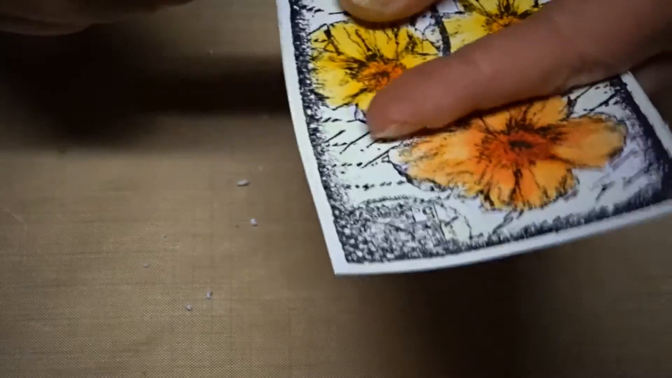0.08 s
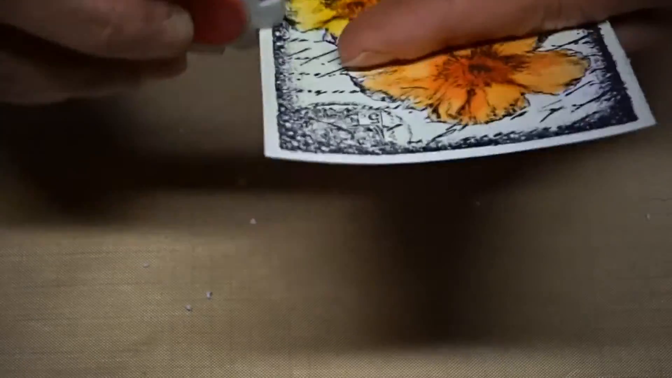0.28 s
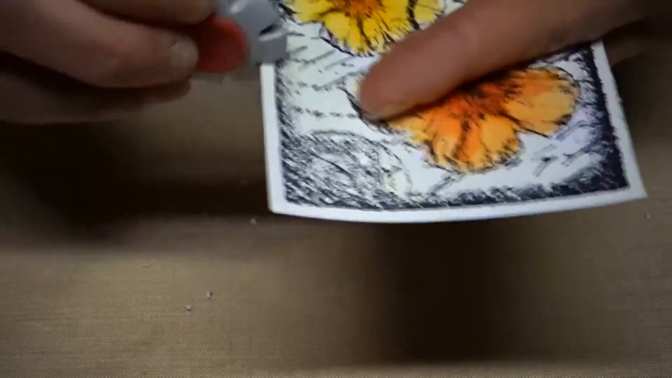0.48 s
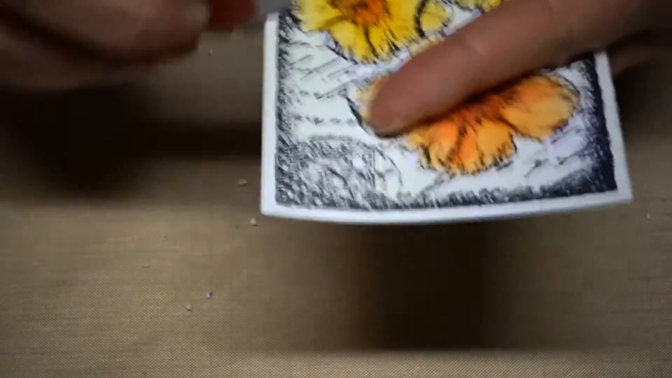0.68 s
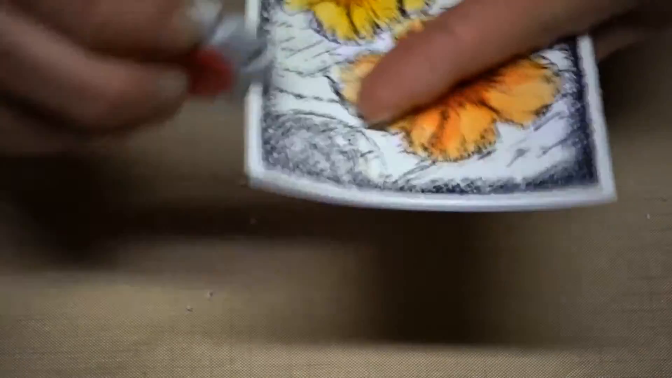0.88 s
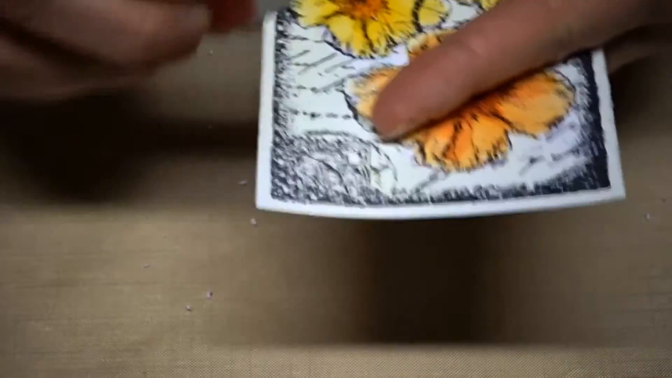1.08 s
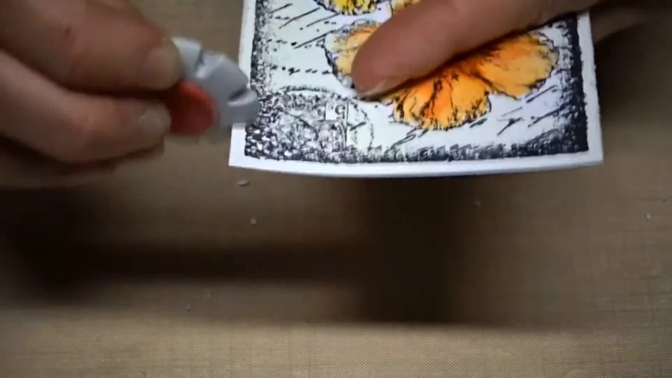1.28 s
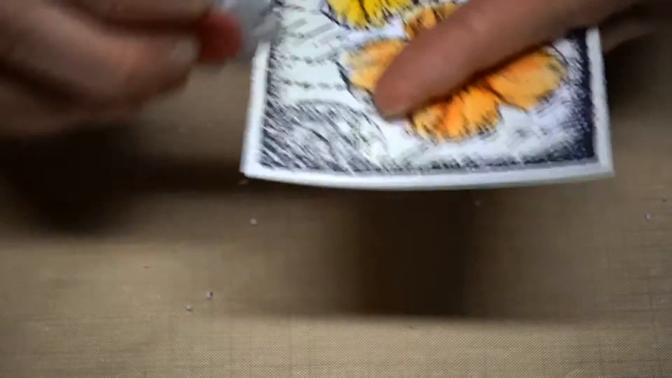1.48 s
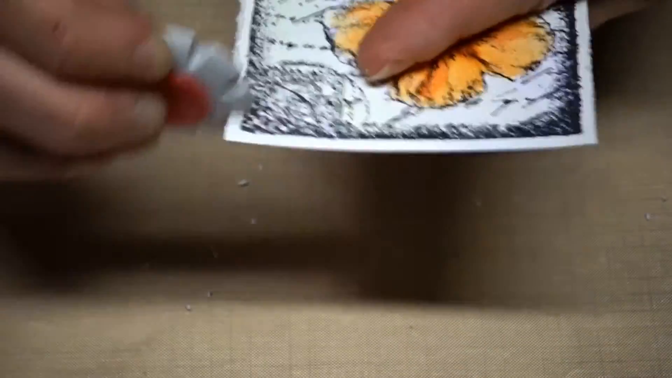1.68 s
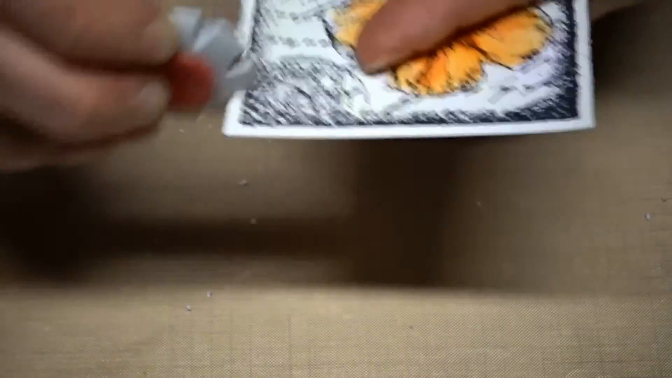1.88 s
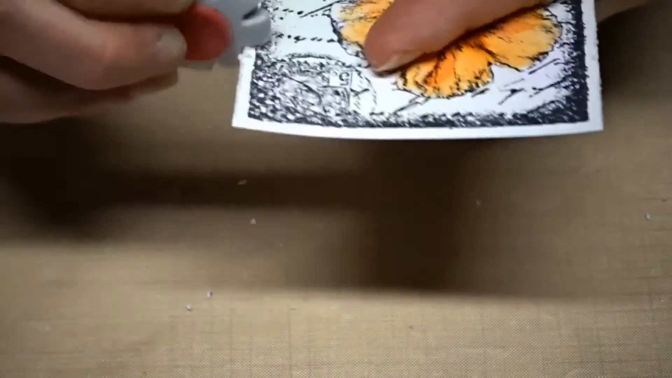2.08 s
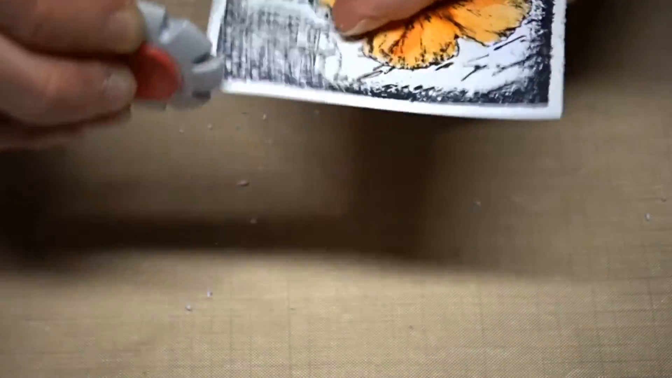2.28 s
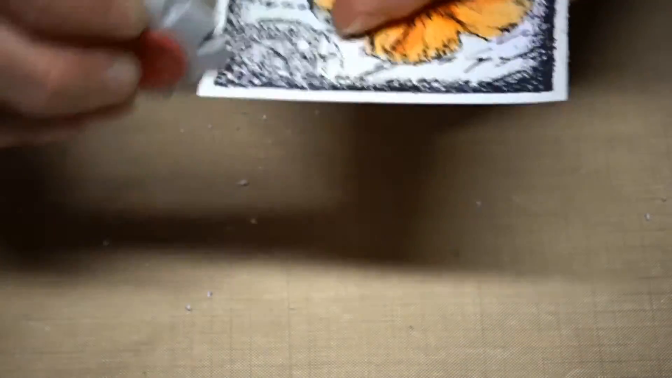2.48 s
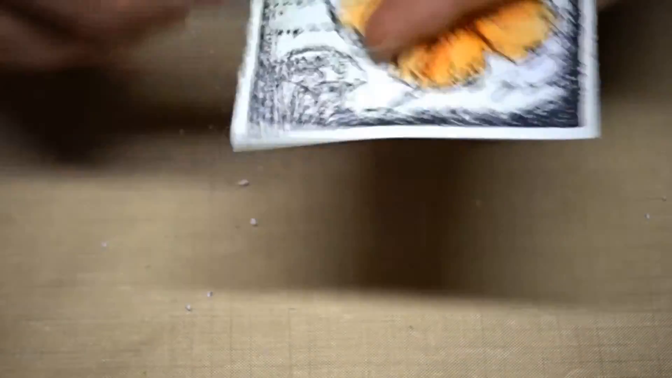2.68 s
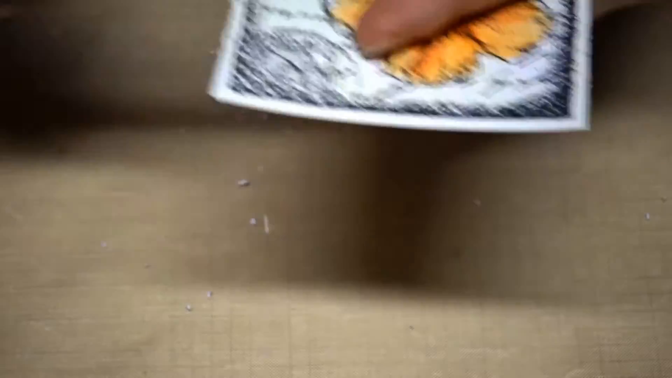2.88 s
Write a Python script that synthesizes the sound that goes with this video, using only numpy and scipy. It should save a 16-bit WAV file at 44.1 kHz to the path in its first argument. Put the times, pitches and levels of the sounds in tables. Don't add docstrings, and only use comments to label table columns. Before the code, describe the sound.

A small notched blade scrapes a paper card edge, close to a stereo microphone: faint touches, then quick firm raspy strokes with tiny gaps and occasional sharp snaps, in a quiet small room.

```python
import sys
import numpy as np
from scipy import signal
from scipy.fft import rfft, irfft, next_fast_len
from scipy.io import wavfile
from scipy.ndimage import uniform_filter1d, map_coordinates

SR = 44100
rng = np.random.default_rng(int(sys.argv[2]) if len(sys.argv) > 2 else 0)


def transcribe(u):
    v = np.clip(np.atleast_2d(u).T, -1, 1)
    q = np.round(v * 32767).astype(np.int16)
    wavfile.write(sys.argv[1], SR, q)


def volts(x):
    e = np.asarray(x, float) / 20
    return 10 ** e


N = 134505


def unit(x):
    return x / np.sqrt(np.mean(abs(x) ** 2) + 1e-20)


def along(points, hz):
    f, v = np.transpose(points)
    return np.interp(np.log(hz + 1), np.log(f + 1), v)


def filtered(x, response):
    m = next_fast_len(N + SR // 2)
    return irfft(rfft(x, m) * response(np.fft.rfftfreq(m, 1 / SR)), m)[..., :N]


def causal(points):
    def response(hz):
        c = irfft(np.log(volts(along(points, hz))))
        c[1:len(c) // 2] *= 2
        c[len(c) // 2 + 1:] = 0
        return np.exp(rfft(c))
    return response


def resonances(rows):
    def response(f):
        total = 0
        for k, (centre, width, db) in enumerate(rows):
            damping = 1j * f * width
            total = total + (-1) ** k * volts(db) * damping / (centre * centre - f * f + damping)
        return total
    return response


def wobble(rate_hz):
    return map_coordinates(rng.standard_normal(3000), [np.arange(N) * rate_hz / SR])


def lumps(rate_hz):
    ceiling = 1.96
    w = wobble(rate_hz)
    return np.where(w > 0, ceiling * np.tanh(w / ceiling), w)


# f/Hz, density/dB per Hz
TONE = [(100, -66), (170, -6.5), (190, -9), (1910, -19), (2140, -20.5), (8870, -30), (15000, -38)]
# f/Hz, level/dB
TONE_SIDE = [(200, -7), (1000, 1), (8000, -1.5)]
# f/Hz, width/Hz, level/dB
HUM_BANDS = [(50, 64, -77.5), (101, 16, -72), (141, 16, -76)]


def air():
    tone_db, hum_side_db = -67, -21

    def colour(hz):
        return volts(along(TONE, hz) + [0 * hz, along(TONE_SIDE, hz)])

    def bands(f):
        return sum(volts(db) * unit(1 / (1 + ((f - c) / w * 2) ** 2)) for c, w, db in HUM_BANDS)

    pair = filtered(rng.standard_normal((2, N)), colour)
    hum = filtered(rng.standard_normal((2, N)), bands) * volts([[0], [hum_side_db]])
    return volts(tone_db) * pair / pair[0].std() + hum


# t/s, length/s, start level/dB, end level/dB
STROKE_LIST = [(.045, 0.061, -72, -58.5), (.097, 0.081, -58.5, -57), (.177, 0.016, -56, -50),
               (.195, 0.02, -48.5, -45), (0.225, 0.12, -37.5, -44.5), (0.341, 0.13, -38, -36.5),
               (0.527, 0.14, -33, -41.5), (0.727, 0.15, -39.5, -33), (0.959, 0.11, -31, -39),
               (1.135, 0.15, -39.5, -29.5), (1.372, 0.0401, -39, -37), (1.432, 0.068, -28.5, -43.5),
               (1.538, 0.15, -40, -36.5), (1.745, 0.092, -36, -38.5), (1.91, 0.095, -41.5, -35),
               (2.068, 0.0803, -37, -43), (2.204, 0.077, -45, -37), (2.379, 0.088, -25.5, -41.5),
               (2.503, 0.088, -42.5, -39.5), (2.649, 0.035, -35.5, -38.5), (2.709, 0.042, -42.5, -47),
               (2.739, 0.045, -44, -33.5), (2.79, 0.029, -58, -51)]


def pressure(extra_db, attack_s=0.0024, late_db=0):
    release_s, arch_db = 0.017, 5
    out = np.zeros(N + SR)
    for (start_s, length_s, start_db, end_db), db in zip(STROKE_LIST, extra_db):
        t = np.arange(round((length_s + 5 * release_s) * SR)) / SR
        u = np.minimum(t / length_s, 1)
        release = np.exp(-np.maximum(t - length_s, 0) / release_s * 2)
        gate = np.minimum(t / attack_s, 1) * release
        slope_db = start_db + (end_db - start_db + late_db) * u
        arched_db = arch_db * (np.sin(np.pi * u) - .5)
        out[round(start_s * SR):][:len(t)] += gate * volts(db + slope_db + arched_db)
    return out[:N]


def tears():
    tears_per_s, spread_db, hiss_share, clump_db, clumps_per_s = 3500, 3.5, 0.4, 2.5, 280
    draw = rng.random((2, N))
    hits = draw[0] < tears_per_s / SR
    sizes = volts(-spread_db * np.log(abs(2 * draw[1] - 1) + 0.0078))
    pops = hits * np.sign(draw[1] - .5) * sizes
    grain = unit(pops) + hiss_share * rng.standard_normal(N)
    return unit(grain * volts(clump_db * lumps(clumps_per_s)))


def patchy(x):
    patch_db, patch_bins, patch_frames = 2.1, 5, 10
    z = signal.stft(x, nperseg=256)[2]
    field = uniform_filter1d(rng.standard_normal(z.shape), size=patch_bins, axis=0)
    field = uniform_filter1d(field, size=patch_frames, axis=1)
    return signal.istft(z * volts(patch_db * unit(field)), nperseg=256)[1][:N]


# chatter f/Hz, chatter level/dB, rasp level/dB, card flex level/dB
STROKE_BITE = [(1203.7, -23, -10, -10), (1203, -20, -6, -13), (1200.4, -15, -6, -13), (909.6, -19, 1, 0.5),
               (900, -22, -3, -2), (900, -13, -7.5, -8), (1250, -4, -7, -4), (953.3, -2.5, -8, -7),
               (1430, -0.5, -4.5, -3.5), (1100.6, -8.5, -12, -12), (1350, 4, -3, 5.5),
               (1406.4, -12, -11, 0), (1079.5, -1, -9, -12), (950, 1, -7.5, -5), (979.6, -3, -8.5, -21),
               (804, -1, -9, -13), (789.6, 1.5, -10, -10), (1139, -4.5, -16, -16), (764.5, 1.5, -8.5, -23),
               (812.6, 6, -8.5, -2.5), (1043, -29, -1.5, 1.5), (1250, -11, -7, -5.5), (790, -39, -11, 6.5)]
# chatter climb/share, corner buzz level/dB
STROKE_DRIFT = [(.1, -4.5), (0.1085, -8), (0.16, -8), (-0.012, -9), (0.11, -4), (0.23, -5), (0, -9.5),
                (.6, -10), (0, -6), (-.2, -14), (0.35, -9.5), (0.14, -9.5), (-.25, -22), (.45, -17),
                (0.039, -20.5), (.2, -16.5), (0.25, -37), (-.5, -22), (.1, -22), (.05, -24),
                (-0.0083, -2.5), (-0.505, -7), (0.028, -17)]


def chatter(clumps):
    jitter, glide = .095, .055
    hz, chatter_db = np.transpose(STROKE_BITE)[:2]
    climbs = np.transpose(STROKE_DRIFT)[0]
    start, length = np.transpose(STROKE_LIST)[:2]
    t = np.arange(N) / SR
    k = np.clip(np.searchsorted(start, t) - 1, 0, None)
    climb = climbs[k] * (np.clip((t - start[k]) / length[k], 0, 1) - .5)
    rate_hz = hz[k] * (1 + climb + jitter * wobble(400) + glide * wobble(30))
    phase = 2 * np.pi * np.cumsum(rate_hz) / SR
    wave = np.sin(phase) + 0.076 * np.sin(2 * phase)
    return wave * unit(clumps ** 0.42 * volts(6.1 * lumps(130))) * pressure(chatter_db)


# t/s, peak level/dB, brightness/dB
GRAB_LIST = [(0.2088, -45, 11), (0.23, -53, -1), (0.238, -44, -2), (0.2677, -36, 0.8), (0.2948, -48, 2.8),
             (0.3114, -38, 4), (0.3295, -37, 6.5), (0.3751, -46, -1.1), (0.4011, -35, -7), (0.417, -47, 3),
             (0.5363, -48, -17), (0.7408, -30, -9), (0.7578, -29, -15.5), (0.7747, -53, -19),
             (0.85, -29, 2), (0.9731, -28.5, 7.3), (0.9828, -26, -5), (1.017, -25, -1), (1.0446, -23, -11),
             (1.1382, -37, -6.5), (1.1945, -35, -14), (1.2023, -36.2, -18), (1.2387, -26, -9.8),
             (1.2551, -32.5, 7.5), (1.2741, -30, -6), (1.3734, -33, 6), (1.3834, -32, 8),
             (1.3932, -35, -28), (1.408, -31, 2), (1.4445, -28, 8), (1.4535, -32, 5), (1.475, -26, -10),
             (1.538, -43.2, -4.7), (1.549, -33, -13), (1.5714, -44, -7.1), (1.5809, -30, -9),
             (1.5999, -34, -8), (1.6127, -25, -17), (1.6313, -33, -13), (1.6543, -34.5, 7),
             (1.754, -46, -7), (1.817, -28, -7.8), (1.8433, -32, -3), (1.916, -42.5, -1), (1.928, -52, -12),
             (1.996, -50, -7), (2.1285, -38, 3), (2.207, -40.5, -22.6), (2.2875, -38.5, 0.5),
             (2.5103, -43, -23), (2.764, -30.5, 4), (2.7794, -22, -15)]


def grabs(level_db):
    rise_s, fall_s = 0.0017, 0.0023
    kicks, t = np.zeros(N), np.arange(SR // 30) / SR
    np.add.at(kicks, np.round(np.transpose(GRAB_LIST)[0] * SR).astype(int), volts(level_db))
    pulse = np.minimum(t / rise_s, 1) * np.exp(-t / fall_s)
    return abs(signal.fftconvolve(kicks, pulse)[:N])


# flap level/dB, bend level/dB, fizz level/dB
STROKE_TINT = [(-11, -28, -1), (-29, -36, 0.5), (-25, -28, -4), (-31, -9, -9), (-25, -8, -7.5),
               (-31, -30, -5.5), (-31, -11, -6.5), (-24, -12.5, -8), (-21, -14, -3.5), (-20, -16, -10),
               (-15.5, -23, -4), (-18, -13, -15), (-20, -12.5, -9.5), (-13.5, -15, -7), (-19.5, -8.5, -9.5),
               (-19, -12, -7.5), (-12.5, -10, -10), (-22.5, -12, -13.5), (-19.5, -14, -5.5),
               (-33, -1.5, -3), (-10, -0.5, 9), (-32, -6, -9), (-24, -24, -7)]
# f/Hz, level/dB
EDGE_BODY = [(150, -37), (260, -12), (700, -3), (1400, -2.5), (1800, -8.5), (2600, -18.5), (5000, -38),
             (9000, -54.5)]
# f/Hz, level/dB
EDGE_RASP = [(1500, -31), (2800, -15), (3500, -3), (4300, -1.5), (5100, -7), (5700, -16.5), (8000, -19.5),
             (12000, -45)]
# f/Hz, level/dB
EDGE_FIZZ = [(3000, -29), (6000, 3), (8000, -9), (9500, -6), (14000, -6.5), (17000, -26)]
# f/Hz, width/Hz, level/dB
CARD_MODES = [(413, 14, 6), (487.5, 20, -3), (600, 8.5, -25), (707, 70, 0), (840, 63, -4),
              (1000, 82, -12.5), (1148, 25, -15), (1287, 140, -8.5), (1430, 15, -7), (1590, 86, -3.5)]
# f/Hz, width/Hz, level/dB
FLAP_MODE = [(212.6, 28, 0)]
# f/Hz, width/Hz, level/dB
BEND_MODE = [(326.4, 35, 0)]
# f/Hz, width/Hz, level/dB
CORNER_MODES = [(1980, 130, 0.5), (2380, 336, 0), (3204, 320, -2.5)]


def scrape():
    rasp_attack_s, rasp_late_db = 0.01, 0.47
    grab_db, grab_rasp_db, fizz_under_rasp_db, level_db = -2.5, -4, -11, -0.13
    shared = 0.3
    _, _, rasp_db, flex_db = np.transpose(STROKE_BITE)
    _, corner_db = np.transpose(STROKE_DRIFT)
    flap_db, bend_db, fizz_db = np.transpose(STROKE_TINT)
    _, peak_db, bright_db = np.transpose(GRAB_LIST)
    clumps = unit(volts(1.6 * lumps(280) - 0.38 * lumps(90)))

    dig = grabs(peak_db + grab_db)
    bright = grabs(peak_db + bright_db + grab_rasp_db)
    body = pressure(np.full(len(STROKE_LIST), -4.0)) + dig
    rasp = pressure(rasp_db, rasp_attack_s, rasp_late_db) + bright
    fizz = volts(fizz_under_rasp_db) * (pressure(fizz_db, rasp_attack_s, rasp_late_db) + bright)

    def corner(f):
        return resonances(CORNER_MODES)(f) ** 2

    layers = [(causal(EDGE_BODY), body),
              (causal(EDGE_RASP), rasp),
              (causal(EDGE_FIZZ), fizz),
              (resonances(CARD_MODES), pressure(flex_db)),
              (resonances(FLAP_MODE), pressure(flap_db)),
              (resonances(BEND_MODE), pressure(bend_db)),
              (corner, pressure(corner_db))]
    common = shared * tears()
    out = np.zeros(N)
    for response, gain in layers:
        drive = unit(common + tears()) * clumps * gain
        out += filtered(drive, lambda f: unit(response(f)))
    return volts(level_db) * (patchy(out) + chatter(clumps))


# t/s, peak level/dB, ring f/Hz, crack level/dB
SNAP_LIST = [(0.197, -35, 1085, 2.5), (0.228, -34, 1690, 10), (0.261, -18.5, 1980, -31),
             (0.268, -33, 790, -13), (0.535, -37, 1520, -13), (0.864, -19.5, 1250, 0),
             (0.954, -6, 1430, -8), (1.381, -14, 1380, -24), (1.4337, -9, 1610, -0.5),
             (1.457, -25, 1560, 0), (1.571, -18.5, 1171, -21), (1.945, -19.5, 980, -13),
             (2.121, -18, 1186, -19), (2.283, -24.5, 935, -6), (2.382, -6, 1350, -13),
             (2.684, -13.5, 790, -11), (2.722, -14.5, 1300, -15), (2.725, -16, 893, 2.5),
             (2.774, -16.5, 822, -17)]


def snaps():
    cycles, rise, crack_s, crack_rise_s = 4.8, .45, .003, 0.00039
    lag_s, knock_lag_s, knock_db = .0005, .001, 21
    out, knocks, t = np.zeros(N + SR), np.zeros(N), np.arange(SR // 40) / SR
    for s, db, hz, crack_db in SNAP_LIST:
        u = t * hz / cycles
        swell = np.sin(np.pi * np.clip(u, 0, 1))
        ring = swell * np.sin(2 * np.pi * hz * t * (1 + rise * (u / 2 - .5)))
        crack = signal.lfilter([1, -.4, -.6], [1, -1.45, .8], rng.standard_normal(len(t)))
        crack = crack * np.minimum(t / crack_rise_s, 1) * np.exp(-t / crack_s)
        snap = 0.37 * ring + volts(crack_db - 21.0) * crack
        out[round((s + lag_s) * SR):][:len(t)] += volts(db) * snap
        knocks[round((s + knock_lag_s) * SR)] = volts(db + knock_db)
    return out[:N] + filtered(knocks, resonances(CARD_MODES))


# f/Hz, t60/s
ROOM_T60 = [(200, 0.6), (530, 0.28), (1400, 0.37), (3700, 0.29), (9700, 0.42)]


def room(x):
    hz, t, z = signal.stft(rng.standard_normal((2, SR // 3)), SR, nperseg=256)
    decay = volts(-60 * t / along(ROOM_T60, hz)[:, None])
    tail = signal.istft(z * decay, SR, nperseg=256)[1]
    tail = tail / np.linalg.norm(tail[0])
    return signal.fftconvolve(np.pad(x, (200, 0))[None], tail, axes=1)[:, :N]


# f/Hz, level/dB
SIDE_LEVEL = [(60, -14), (150, -27), (380, -27), (950, -19), (2380, -10), (5980, -3), (15000, -6)]
# f/Hz, level/dB
LEFT_LEAN = [(60, -3), (240, 0.0), (950, -0.5), (3770, -0.5), (15000, -0.5)]


def scene():
    room_db, room_side_db, near_side_db, low_cut_hz = -10.5, -7.5, -8.5, 129.7
    air_mid, air_side = air()
    near = scrape() + snaps()
    wet = room(near)
    turns = np.arange(200) * 110, rng.standard_normal(200)

    def scatter(hz):
        return np.exp(1.5j * np.interp(hz, *turns) - 2j * np.pi * hz * .004)

    def lean(hz):
        low_cut = (1j * hz / (low_cut_hz + 1j * hz)) ** 4
        return volts(along(LEFT_LEAN, hz) * np.array([[.5], [-.5]])) * low_cut

    side = volts(near_side_db) * filtered(near, scatter) + volts(room_side_db) * wet[1]
    side = filtered(side, lambda hz: volts(along(SIDE_LEVEL, hz)))
    mid = near + volts(room_db) * wet[0]
    pair = filtered(np.array([mid + side, mid - side]), lean)
    return pair + [air_mid + air_side, air_mid - air_side]


def band_limit(x):
    return signal.sosfilt(signal.butter(12, 16330, fs=SR, output="sos"), x)


def record(dry):
    top_hz = 15200
    mix = filtered(dry, lambda hz: volts(-np.clip((hz - top_hz) / 8, 0, 35)))
    return band_limit(mix)


dry = scene()
out = record(dry)
transcribe(out)
```